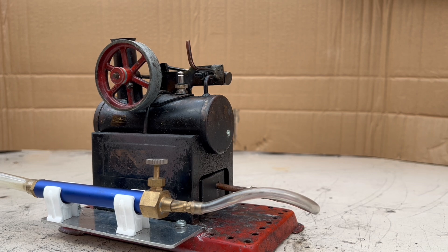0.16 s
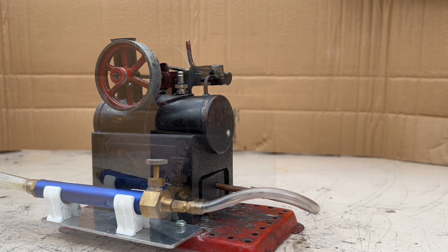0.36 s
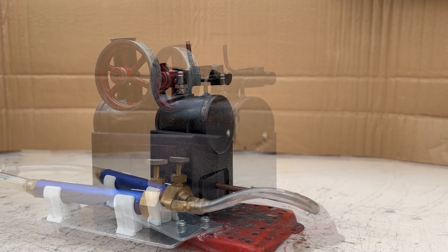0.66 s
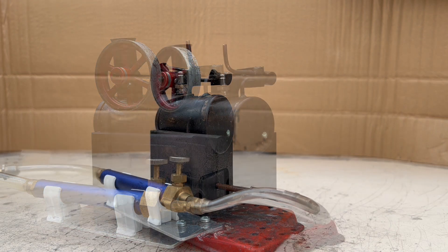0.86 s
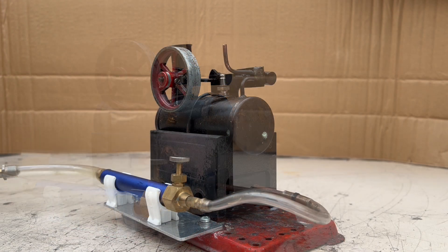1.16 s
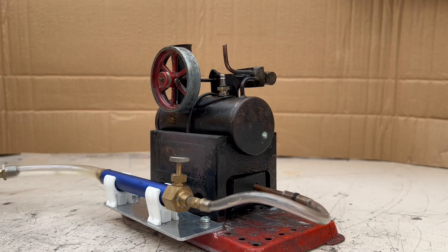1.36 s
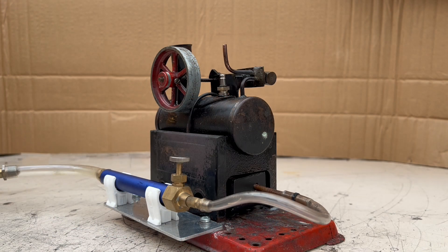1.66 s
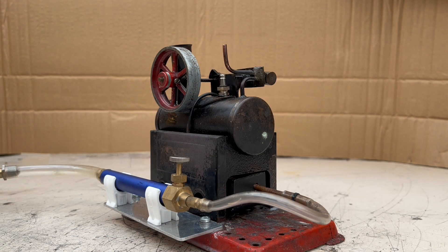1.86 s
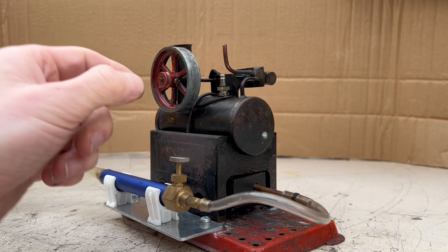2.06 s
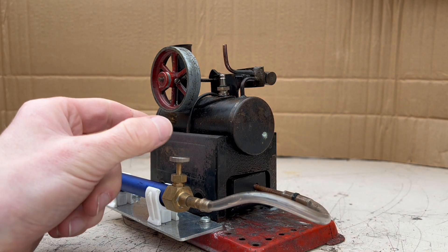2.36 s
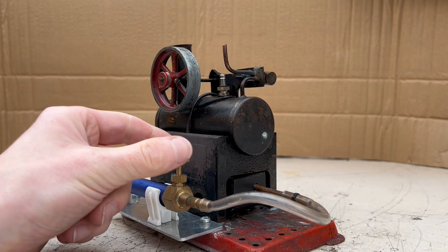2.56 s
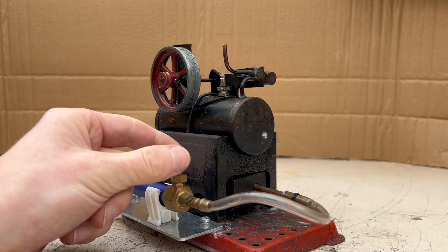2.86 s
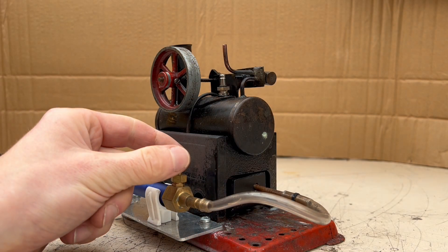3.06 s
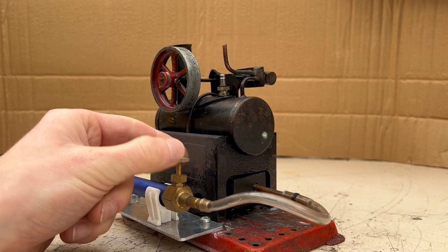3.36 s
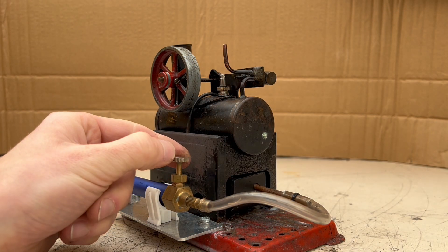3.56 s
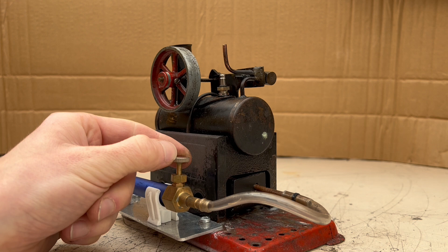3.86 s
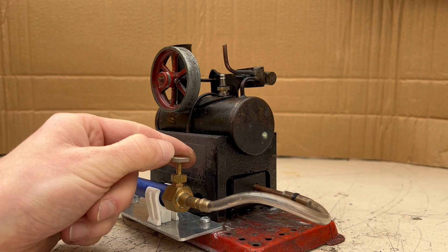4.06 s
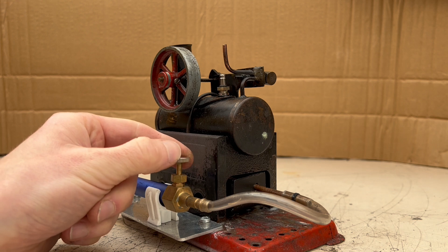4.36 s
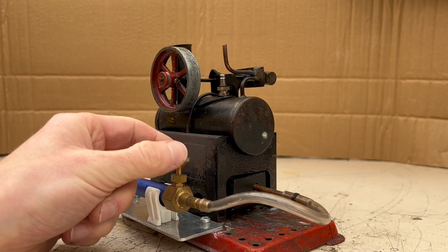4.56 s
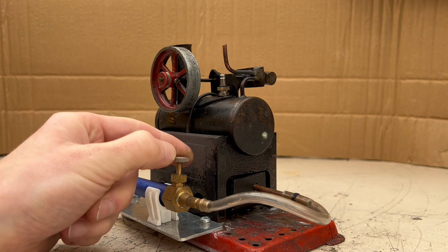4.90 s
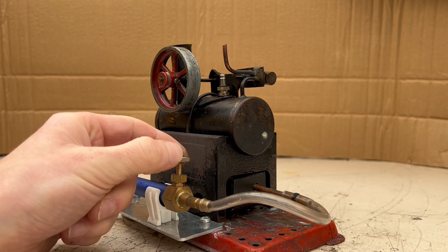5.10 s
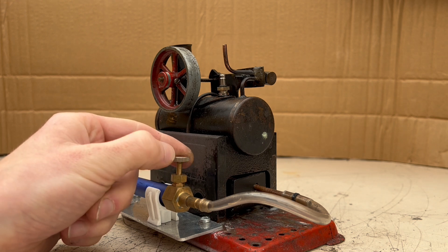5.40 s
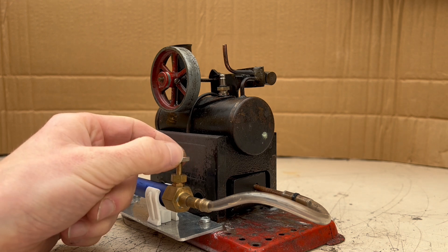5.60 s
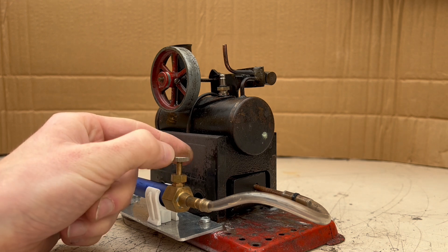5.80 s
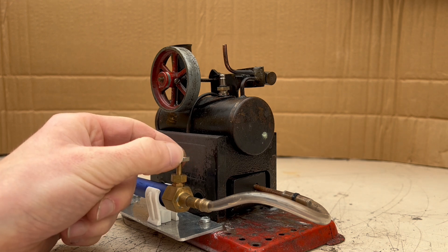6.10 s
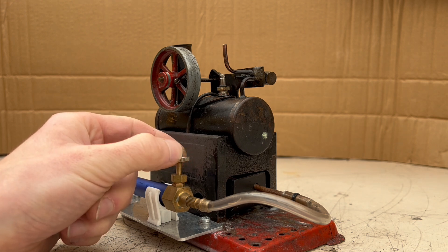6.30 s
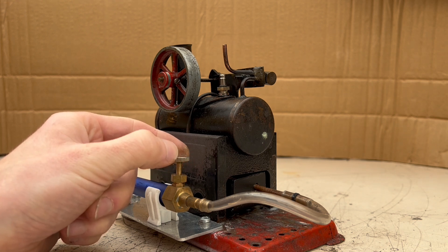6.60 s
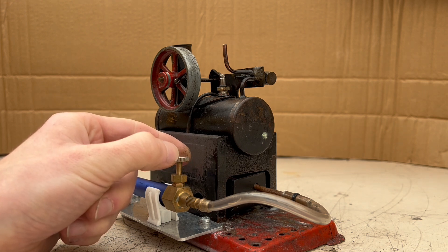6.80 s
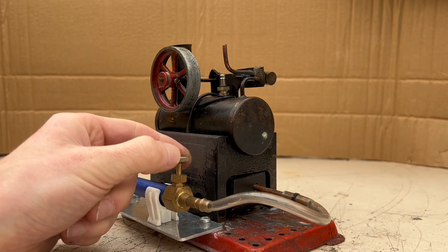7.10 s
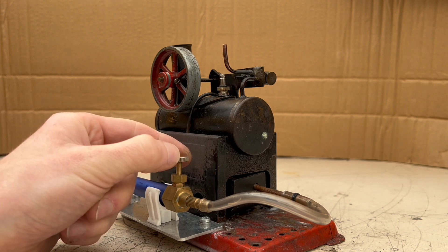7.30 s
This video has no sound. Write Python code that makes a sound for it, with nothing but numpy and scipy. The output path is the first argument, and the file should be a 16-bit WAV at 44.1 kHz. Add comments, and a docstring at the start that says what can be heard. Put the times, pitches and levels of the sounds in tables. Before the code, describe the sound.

Close stereo sound of a small gas burner under a metal boiler. Broad low rumble and a swelling bass hum lie beneath. Airy hiss rises early, ticks lightly, and sings in brief thin high whistles. It weakens almost to nothing when the valve is turned down, then opens again into a fuller, resonant rushing roar that keeps growing slightly to the end. No speech.

```python
"""A low drone swells and sinks over a broad rumble, then a gas jet hisses and its flame roars in the firebox
of a small metal boiler on a bench; a hand closes, then opens the valve. The nozzle whistles thinly, the metal ticks.
Hiss, roar and rumble are shaped noise, drone and whistles are gliding sines, ticks are short noise bursts.
Two microphone ports a few centimetres apart hear it all."""
import sys
import numpy as np
from scipy import signal
from scipy.fft import rfft, irfft, next_fast_len
from scipy.io import wavfile
from scipy.ndimage import uniform_filter1d, map_coordinates

SR = 44100
rng = np.random.default_rng(int(sys.argv[2]) if len(sys.argv) > 2 else 0)


def invert_db(level):
    """Linear amplitude ratio for a level in decibels (20 dB per decade), elementwise."""
    return 10 ** (np.asarray(level, dtype=float) / 20)


def store_pcm(level_fs):
    """Save levels as 16-bit WAV."""
    pcm = np.round(np.clip(level_fs, -1, 1) * 32767).astype(np.int16)
    wavfile.write(sys.argv[1], SR, np.atleast_2d(pcm).T)


N = 328526  # samples, about 7.45 s


def unit(x):
    """Scaled to rms 1."""
    return x / np.sqrt(np.mean(x ** 2) + 1e-20)


def along(points, hz):
    """Columns of a table over frequency, interpolated on a log axis."""
    f, *columns = np.transpose(points)
    return [np.interp(np.log(hz + 1), np.log(f + 1), column) for column in columns]


def curves(rows):
    """One value per sample for each column after the time."""
    time_s, *columns = np.transpose(rows)
    return [np.interp(np.arange(N) / SR, time_s, column) for column in columns]


def wobble(rate):
    """A smooth random curve through rate random knots a second."""
    knots = rng.standard_normal(int(N * rate / SR) + 4)
    return map_coordinates(knots, [np.arange(N) * rate / SR])


def at_ports(pair, gain, ports):
    """Two signals, one shared and one differing, coloured and laid on the two microphone ports."""
    size = next_fast_len(N + 8192)
    hz = np.fft.rfftfreq(size, 1 / SR)
    likeness, lead_rad, lean_db = along(ports, hz)
    turn = np.arccos(np.clip(likeness, 0, 1)) / 2
    shared, differing = rfft(pair, size) * gain(hz) * [np.cos(turn), np.sin(turn)]
    skew = invert_db(lean_db / 2) * np.exp(-.5j * lead_rad)
    left = (shared + differing) * skew
    right = (shared - differing) / skew
    return irfft([left, right], size)[:, :N]


def rush(gain, ports, patchy_db):
    """Turbulent noise of rms 1 whose strength varies in patches of time and pitch."""
    spectra = signal.stft(rng.standard_normal((2, N)), nperseg=512)[2]
    patches = rng.standard_normal(spectra.shape[1:])
    patches = uniform_filter1d(patches, size=30, axis=0)  # smooth over pitch
    patches = unit(uniform_filter1d(patches, size=10, axis=1))  # smooth over time
    pair = signal.istft(spectra * invert_db(patchy_db * patches), nperseg=512)[1][:, :N]
    return unit(at_ports(pair, gain, ports))


def tone(rows, octave_db, unsteady):
    """A sine and its octave on a (time, pitch, level) table, silent outside it; unsteady is in radians."""
    hz, level_db = curves(rows)
    t = np.arange(N) / SR
    edge = np.clip(np.minimum(t - rows[0][0], rows[-1][0] - t) / 0.0095, 0, 1)  # 9.5 ms fades
    phase = 2 * np.pi * (np.cumsum(hz) / SR + rng.random()) + unsteady
    wave = np.sin(phase) + invert_db(octave_db) * np.sin(2 * phase)
    return np.sqrt(2) * edge * invert_db(level_db) * wave


# Rumble level over time: time_s, low_db, upper_db
RUMBLE_LEVELS = [(0, -39, -48.5), (1.0, -42.5, -53), (1.5, -40.5, -49.5), (2.55, -38, -47),
                 (4.3, -39, -51.5), (5.4, -41.5, -52), (7.45, -40.5, -53.5)]
# Colour of the low rumble: freq_hz, density_db (relative, per Hz)
LOW_COLOUR = [(20, -22), (33, -14), (42, 0), (62, 2), (75, -6), (100, -3), (140, -8), (220, -8), (330, -10),
              (420, -14), (500, -24), (900, -45), (3000, -100)]
# Colour of the upper rumble: freq_hz, density_db (relative, per Hz)
UPPER_COLOUR = [(300, -20), (500, 0), (1000, -3), (1400, -9), (2000, -12), (2700, -24), (4000, -33),
                (6000, -44), (16000, -62)]
# Rumble at the two ports: freq_hz, likeness (0-1), right_lead_rad, left_minus_right_db
RUMBLE_PORTS = [(50.7, 0.97, 0, 3), (142, 0.96, -0.93, 0), (347, 0.88, 0.81, -0.7), (566, 0.53, 1.5, -1),
                (680, 0, -0.54, -5), (734, 0.7, -2.5, -4), (1130, 0, -0.16, -0.5), (15900, 0, 1.5, 16.5)]


def rumble():
    """Broad low noise all round the bench, in a low and an upper part that swell separately."""
    low_db, upper_db = curves(RUMBLE_LEVELS)
    low = rush(lambda hz: invert_db(along(LOW_COLOUR, hz)[0]), RUMBLE_PORTS, patchy_db=0.61)
    upper = rush(lambda hz: invert_db(along(UPPER_COLOUR, hz)[0]), RUMBLE_PORTS, patchy_db=1.33)
    return invert_db(low_db) * low + invert_db(upper_db) * upper


# Pitch of the low drone: time_s, pitch_hz
LOW_DRONE_PITCH = [(0, 55.94), (.9, 53.7), (2.0, 54.3), (2.9, 57.23), (5.7, 57.3), (7.45, 58.6)]
# Level of the low drone's fundamental: time_s, level_db (rms)
LOW_DRONE_LEVEL = [(0, -38.5), (.45, -43), (1.0, -47.5), (1.45, -45.5), (1.76, -39), (2.0, -42),
                   (2.99, -30), (3.11, -37), (3.71, -28.5), (3.92, -37), (4.73, -26), (5.04, -42),
                   (5.21, -32.5), (5.58, -39.5), (6.0, -37), (6.1, -47), (6.17, -34), (6.32, -53),
                   (6.55, -34.5), (7.09, -43.5), (7.35, -31.5), (7.45, -36)]
# Upper drone, heard early only: time_s, pitch_hz, level_db (rms of the fundamental)
HIGHER_DRONE = [(0.04, 81, -49), (0.32, 83.66, -31.5), (0.61, 88.5, -38.5), (0.77, 89.6, -35),
                (0.92, 91.2, -48), (1.3, 87, -48.5), (1.5, 85.7, -40.5), (1.8, 84.55, -42),
                (2.3, 84.9, -48)]


def drone():
    """Two low tones with slightly wandering phase, alike at both ports."""
    rows = np.transpose([np.arange(N) / SR, *curves(LOW_DRONE_PITCH), *curves(LOW_DRONE_LEVEL)])
    low = tone(rows, octave_db=-17.0, unsteady=0.34 * wobble(6))
    upper = tone(HIGHER_DRONE, octave_db=-34.5, unsteady=0.11 * wobble(5.5))
    return low + upper


# Ticks of the metal: start_s, level_db (rms of the shared noise at onset, before decay), centre_hz
METAL_TICKS = [(.119, -61, 3500), (1.0560, -50, 7000), (1.0598, -55, 13000), (1.0629, -46, 8000),
               (1.0666, -47, 14000)]


def ticks():
    """Each tick is a burst of noise around its own pitch, dying 60 dB in 7 ms, partly shared by the ports."""
    x = np.zeros((2, N + SR))
    t = np.arange(SR // 50) / SR
    for start_s, level_db, hz in METAL_TICKS:
        edges_hz = [hz / 3, min(2 * hz, SR * .49)]
        band = signal.butter(2, edges_hz, "band", fs=SR, output="sos")
        shared, differing = unit(signal.sosfilt(band, rng.standard_normal((2, len(t)))))
        decay = invert_db(level_db - 60 * t / .007)
        x[:, round(start_s * SR):][:, :len(t)] += decay * (shared + [[.7], [-.7]] * differing)
    return x[:, :N]


# Gas flow through the valve: time_s, hiss_db (jet level before flutter and sputter)
VALVE_FLOW = [(0, -80), (.15, -80), (.33, -87), (.5, -77), (.9, -67), (1.15, -62.5), (1.5, -62.5),
              (3.2, -59.5), (4.0, -63), (4.3, -71.5), (4.5, -74), (4.72, -79.5), (4.85, -69.5), (5.0, -63),
              (5.4, -57.5), (5.8, -54.5), (7.45, -53.5)]
# Nozzle and burner at the two ports: freq_hz, likeness (0-1), right_lead_rad, left_minus_right_db
BURNER_PORTS = [(300, .8, .5, -1), (600, .5, .9, -4), (800, .5, -2, -4), (1100, .8, -.8, 2),
                (1900, .65, 0, 0), (2500, .7, -1.3, 0), (3000, .3, -.5, 0), (3600, .7, -2, 2),
                (5200, .6, -2.6, 1), (5800, .2, -4, -1), (6300, .62, -6.2, -1), (7400, .6, -5.9, 0),
                (8700, .75, -4.7, 0), (9300, .86, -3.95, 0), (10400, .97, -2.9, 0), (11800, .8, -1.4, 0),
                (13000, .93, -.35, 0), (14100, .96, .3, 0), (14800, .8, 1.3, 0), (16000, .75, 2.8, 0)]
# Clearest whistles, straight glides before random bends:
# start_s, length_s, first_hz, last_hz, level_db (before flicker and port balance)
CLEAR_WHISTLES = [(.48, 0.078, 7500, 8000, -81), (.56, 0.092, 7950, 7600, -82.5),
                  (.64, 0.15, 7200, 6980, -78), (.8, 0.076, 6900, 6700, -77), (0.869, .11, 7080, 7030, -81),
                  (1.138, 0.051, 7620, 7000, -73), (1.741, .06, 7900, 7550, -68),
                  (2.5, 0.071, 7300, 6950, -68), (2.6, .05, 7800, 8000, -72),
                  (2.76, 0.092, 7950, 7460, -72), (1.927, .07, 7000, 7430, -71),
                  (1.331, .06, 7200, 7040, -73), (3.08, 0.13, 7550, 7900, -67.5),
                  (3.669, 0.051, 7280, 7020, -69), (3.735, 0.097, 7030, 7200, -65.5),
                  (3.825, 0.26, 7270, 7070, -66.5), (4.08, 0.07, 6800, 6730, -71),
                  (4.24, 0.1, 9700, 9350, -68), (4.408, .05, 7150, 7300, -75),
                  (5.002, 0.1, 7160, 7200, -67)]


def whistle():
    """The jet sings at the nozzle edge: clear glides, and a restless tone that follows the flow up to a limit."""
    wander_hz = 59.9  # random pitch bend per unit of wobble
    clear = 0
    for start_s, length_s, first_hz, last_hz, level_db in CLEAR_WHISTLES:
        glide = [(start_s, first_hz, level_db), (start_s + length_s, last_hz, level_db)]
        bend = 2 * np.pi * np.cumsum(wander_hz * wobble(45)) / SR
        clear = clear + tone(glide, octave_db=-12.5, unsteady=0.45 * wobble(150) + bend)
    restless_hz = 7400 + 300 * wobble(14)
    restless_db = np.minimum(curves(VALVE_FLOW)[0], -62) - 17 + 5 * wobble(26)
    restless = invert_db(restless_db) * np.sin(2 * np.pi * np.cumsum(restless_hz) / SR)
    song = invert_db(2.9 * wobble(40)) * clear + restless
    return at_ports([song, 0 * song], lambda hz: 1, BURNER_PORTS)


# Firebox and boiler shell resonances: freq_hz, width_hz, level_db (relative, before ring_db)
SHELL_RESONANCES = [(612, 60, -6), (1029, 36, 2), (1281, 25, -5), (1330, 30, -4), (1382, 36, -2),
                    (1510, 60, -3), (1572, 26, 0), (1628, 25, -4), (1800, 50, -5), (1858, 32, 2),
                    (2176, 42, -6), (2755, 35, -13), (2880, 45, -11), (3050, 50, -11), (3142, 30, -10),
                    (3240, 70, -10), (3600, 70, -11), (3765, 85, -7), (3987, 45, -12), (4315, 35, -14),
                    (4880, 200, -14), (5530, 35, -17), (6260, 90, -14), (6630, 110, -18), (7150, 150, -16),
                    (7680, 150, -16), (8250, 83, -17), (8590, 77, -19)]


def boxed(spectrum, ring_db, above_hz):
    """A broad colour plus the firebox resonances that the source reaches, added as powers."""
    def gain(hz):
        rings = sum(invert_db(2 * level_db) / (1 + ((hz - centre_hz) * 2 / width_hz) ** 2) ** 2
                    for centre_hz, width_hz, level_db in SHELL_RESONANCES)
        reach = hz ** 6 / (hz ** 6 + above_hz ** 6)
        broad = invert_db(2 * along(spectrum, hz)[0])
        return np.sqrt(broad + invert_db(2 * ring_db) * rings * reach)
    return gain


# Broad colour of the jet under the resonances: freq_hz, density_db (relative, per Hz)
JET_COLOUR = [(700, -64.5), (2000, -25), (4000, -5), (6000, -8), (8300, -6), (9000, -7), (9900, -1.5),
              (10700, -0.5), (11600, -3), (12800, -2), (14200, -5.5), (15200, -2), (16500, -17)]
# Broad colour of the flame under the resonances: freq_hz, density_db (relative, per Hz)
FLAME_COLOUR = [(300, -28.5), (600, -19.5), (1200, -9.5), (2500, -13), (4500, -16), (7000, -24),
                (10000, -55.5), (16000, -72)]
# Reflections of the jet off bench and wall: delay_ms, level_db (relative to the direct jet)
JET_ECHOES = [(.9, -15), (2.1, -14), (4.7, -15), (7.9, -16)]


def burner():
    """The jet hisses, the flame fills the firebox and flutters; a nearly shut valve passes gas unevenly."""
    hiss_db, = curves(VALVE_FLOW)
    # the roar follows the hiss, and keeps building once the valve is wide open
    roar_over_hiss_db, wide_open_s = -.5, 4.98
    build_db, build_s, creep_db_per_s = 6.5, 0.37, 1.5
    since_s = np.clip(np.arange(N) / SR - wide_open_s, 0, None)
    growth_db = build_db * (1 - np.exp(-since_s / build_s)) + creep_db_per_s * since_s
    roar_db = hiss_db + roar_over_hiss_db + growth_db
    flutter = wobble(11) + 0.39 * wobble(27)

    jet = rush(boxed(JET_COLOUR, ring_db=11, above_hz=2940), BURNER_PORTS, patchy_db=0.53)
    echoes = sum(invert_db(level_db) * np.roll(jet, round(delay_ms * SR / 1000), axis=1)
                 for delay_ms, level_db in JET_ECHOES)
    jet = unit(jet + echoes)
    sputter_db = np.clip((-62 - hiss_db) * .2, 0, 2) * wobble(70)  # only at low flow
    flame = rush(boxed(FLAME_COLOUR, ring_db=2.0, above_hz=390), BURNER_PORTS, patchy_db=1.04)
    hiss = invert_db(hiss_db + 0.59 * flutter + sputter_db) * jet
    roar = invert_db(roar_db + 0.21 * flutter) * flame
    return hiss + roar


def scene():
    """Everything on and around the bench, as it reaches the two ports."""
    return burner() + whistle() + drone() + rumble() + ticks()


def low_pass(x):
    """Removes everything above the highest recorded frequency."""
    return signal.sosfilt(signal.butter(12, 15770, fs=SR, output="sos"), x)


def record(dry):
    """The finished two-port mix, ready to be written."""
    return low_pass(dry)


dry = scene()
out = record(dry)
store_pcm(out)
```